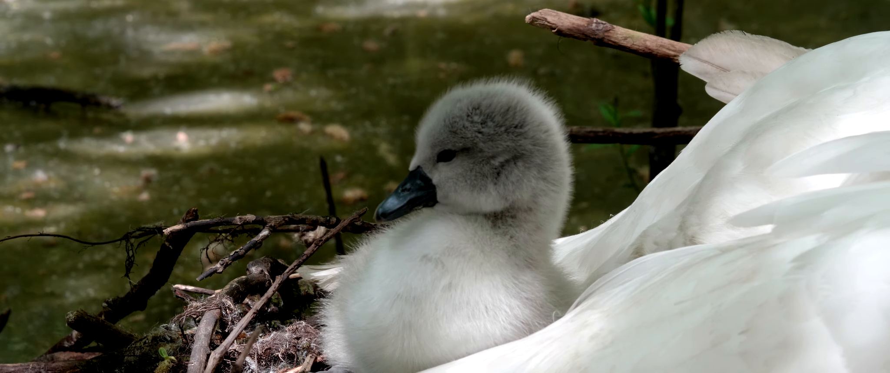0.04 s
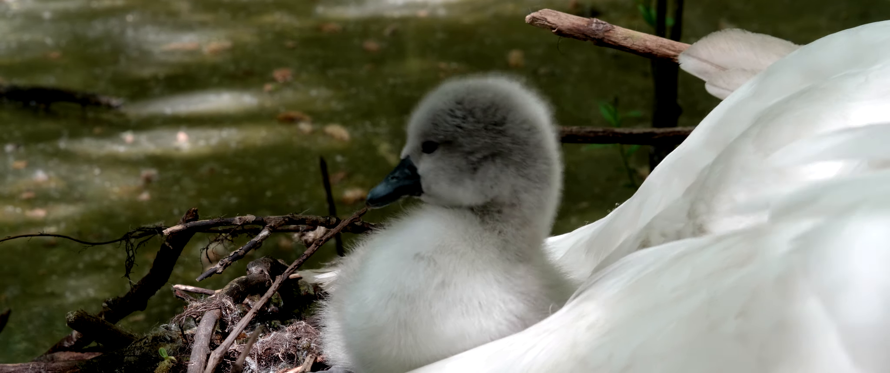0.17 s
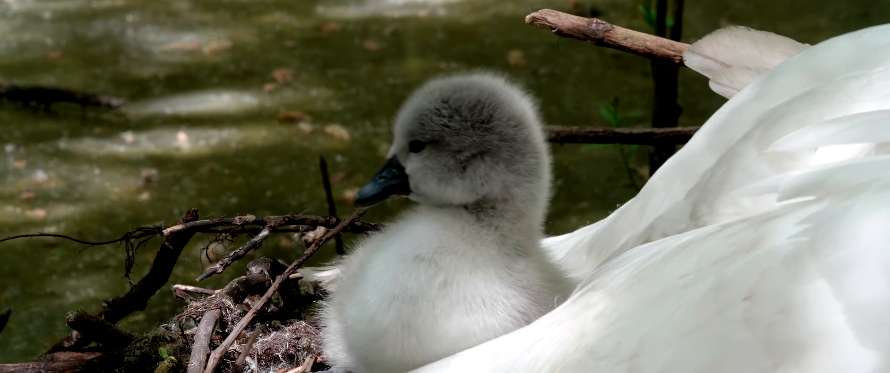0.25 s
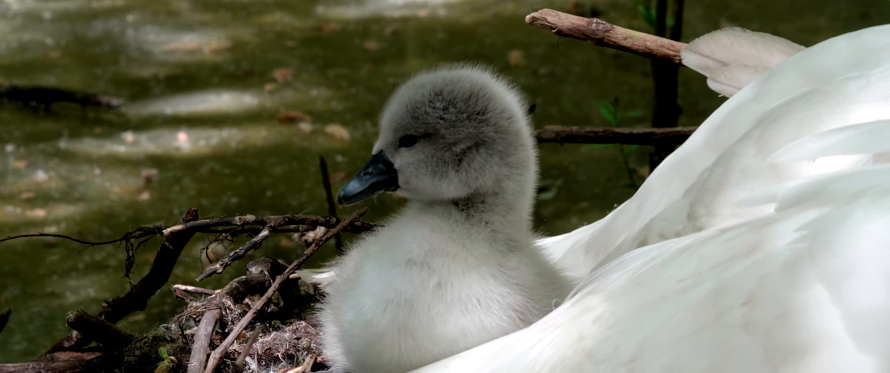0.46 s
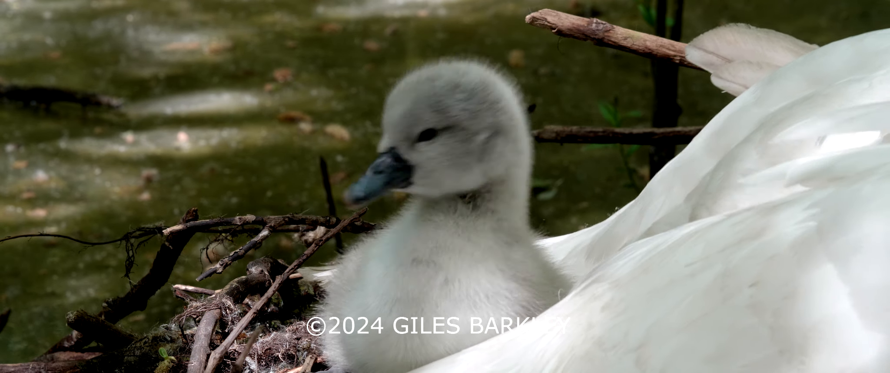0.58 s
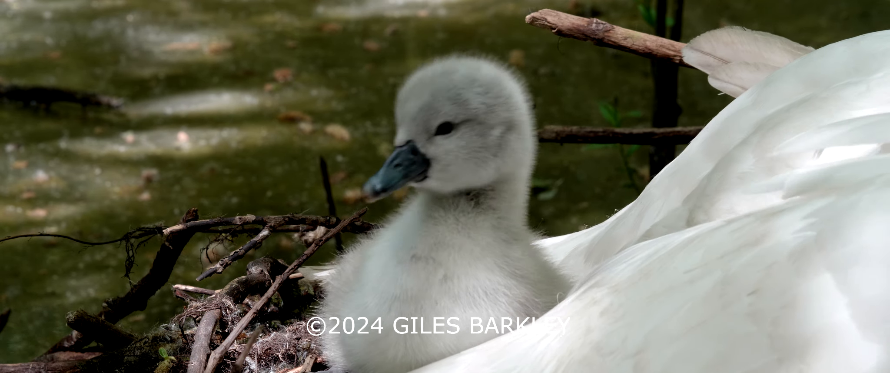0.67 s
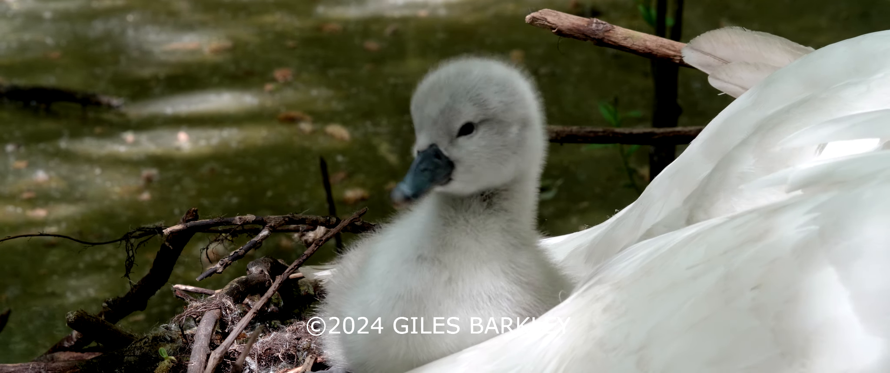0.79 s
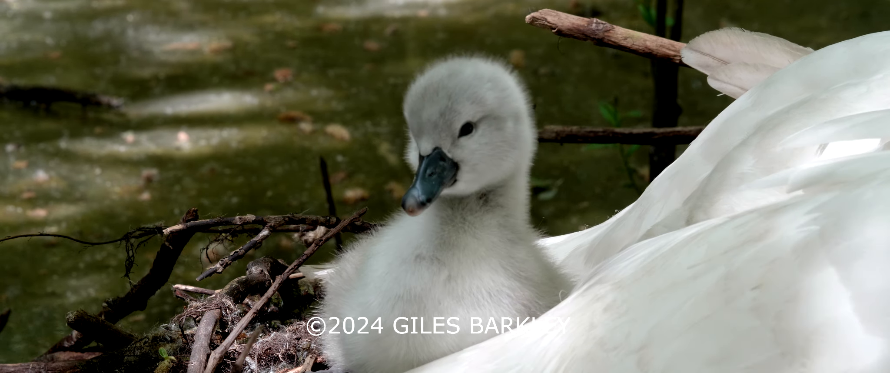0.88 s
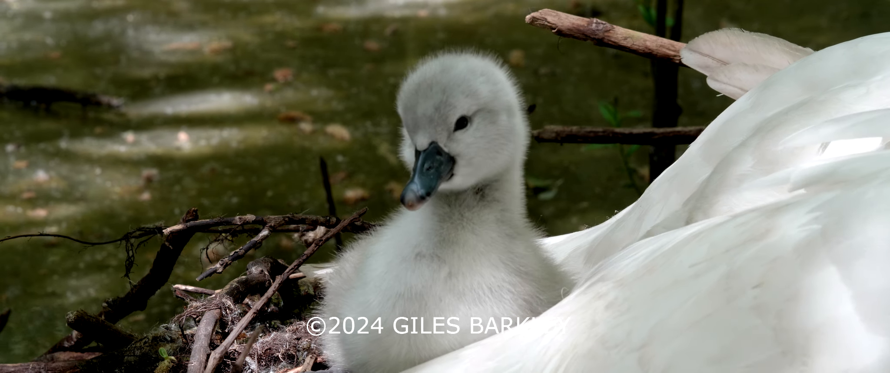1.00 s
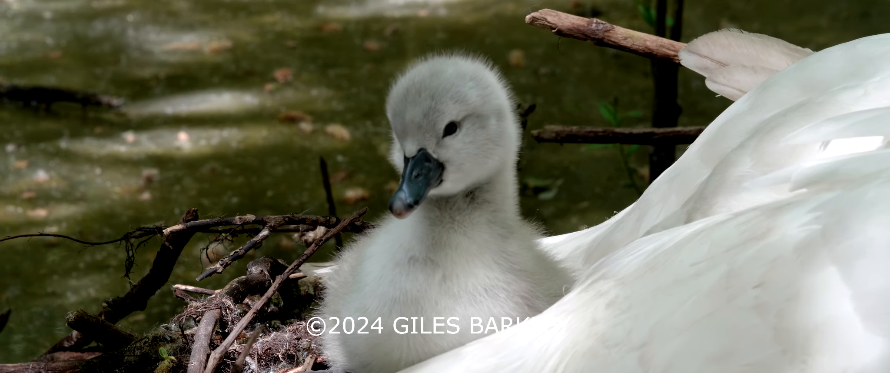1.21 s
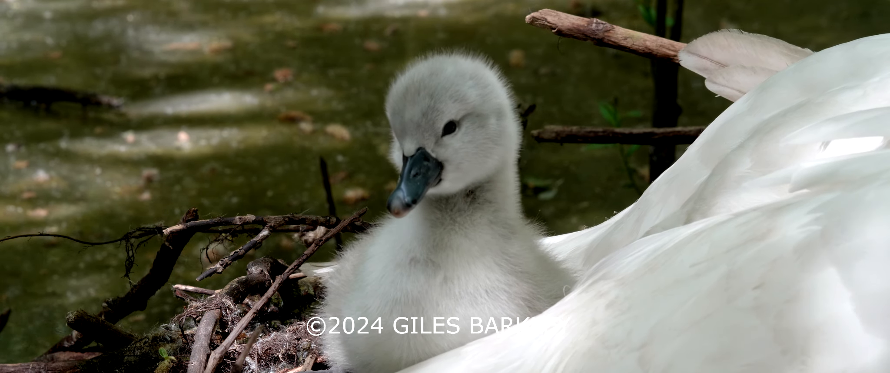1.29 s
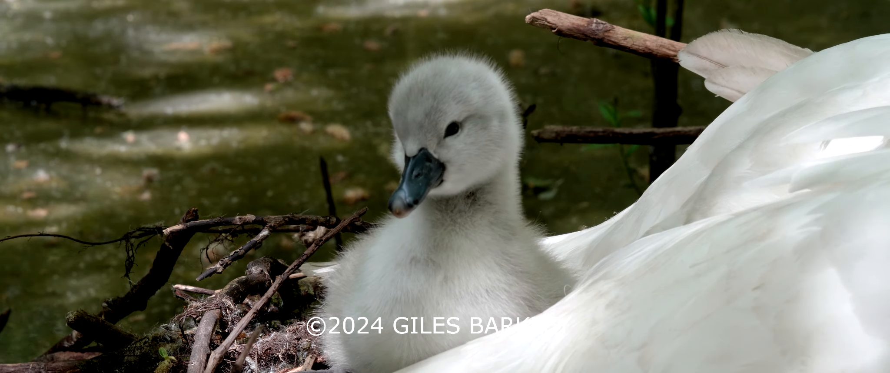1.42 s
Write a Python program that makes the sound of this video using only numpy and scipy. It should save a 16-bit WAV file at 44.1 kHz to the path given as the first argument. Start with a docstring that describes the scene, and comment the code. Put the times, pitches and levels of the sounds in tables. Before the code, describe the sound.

A swan close by gives two short hoarse grunting snorts that break into rattling throat pops

```python
"""A swan close by grunts twice: a nasal hiss opens into a short hoarse note that breaks into slow, separate
throat pops, then comes a second rattle of pops with rushing air but no note. Cygnets peep softly, and small
birds farther off whistle thin high notes over the low rumble of the waterside. Pops are short pushes that ring
throat, bill and chest; the note is a wavering tone with a rasp; air sounds are filtered noise;
peeps are gliding tones and whistles are tones blurred in pitch."""
import sys
import numpy as np
from scipy import signal
from scipy.fft import rfft, irfft
from scipy.io import wavfile

SR = 44100
rng = np.random.default_rng(int(sys.argv[2]) if len(sys.argv) > 2 else 0)


def materialize(psi):
    """Save the field psi as 16-bit PCM at rate SR to the path in sys.argv[1].

    A 1-D psi becomes a single channel; in a 2-D psi each row is a channel.
    """
    bounded = np.clip(np.atleast_2d(psi).T, -1, 1)
    quanta = np.round(bounded * 32767).astype(np.int16)
    wavfile.write(sys.argv[1], SR, quanta)


N = 63945  # length in samples, about 1.45 s


def undb(db):
    """Decibels to gain."""
    return 10 ** (np.asarray(db) / 20)


def unit(x):
    """Scale to rms 1."""
    return x / np.sqrt(np.mean(x ** 2) + 1e-20)


def curve(table, axis=1):
    """One column of a table, joined by straight lines in time."""
    rows = np.array(table, float)
    return np.interp(np.arange(N) / SR, rows[:, 0], rows[:, axis])


def swell(table, axis=1):
    """Gain from a level curve, with a short fade centred on its first and last times."""
    fade_s = .006
    t = np.arange(N) / SR
    inside_s = np.minimum(t - table[0][0], table[-1][0] - t)
    return undb(curve(table, axis=axis)) * np.clip(inside_s / fade_s + .5, 0, 1)


def colour(x, points):
    """Filter through (frequency [Hz], level [dB]) points, falling 40 dB per octave above the last."""
    hz, db = np.array(points, float).T
    f = np.maximum(np.fft.rfftfreq(2 * N, 1 / SR), 1)
    shape = np.interp(np.log(f), np.log(hz), db) - 40 * np.log2(np.maximum(f / hz[-1], 1))
    # folding the cepstrum (the spectrum of the log gain) makes the filter respond only after its input
    cepstrum = irfft(np.log(undb(shape)))
    cepstrum[1:N] *= 2
    cepstrum[N + 1:] = 0
    return irfft(rfft(x, 2 * N) * np.exp(rfft(cepstrum)))[:N]


def ring(x, modes):
    """Add up resonances side by side, each given as (frequency [Hz], width [Hz], level [dB])."""
    out = 0
    for hz, width_hz, db in modes:
        b, a = signal.iirpeak(hz, hz / width_hz, fs=SR)
        out = out + undb(db) * signal.lfilter(b, a, x)
    return out


def soften(x, hz):
    """Fourth-order low-pass."""
    return signal.sosfilt(signal.butter(4, hz, fs=SR, output="sos"), x)


def noise():
    """White noise."""
    return rng.standard_normal(N)


def walk(rate_hz):
    """Smooth random wander, rms 1; a higher rate makes it move faster."""
    f = np.fft.rfftfreq(N, 1 / SR)
    return unit(irfft(rfft(noise()) * np.exp(-(f / rate_hz) ** 2), N))


def turns(hz):
    """Phase in radians of a tone that follows a changing pitch."""
    return 2 * np.pi * np.cumsum(hz) / SR


def waterside():
    """A low steady outdoor rumble under a faint even hiss, both filtered noise."""
    rumble_db, hiss_db = -43, -67
    # colour of the rumble: (frequency [Hz], level [dB per Hz])
    rumble_colour = [(15, -39), (25, 0.5), (75, 0.5), (160, -5.5), (197, -0.5), (232, -8), (267, -6.5),
                     (302, -8.5), (657, -10.5), (1140, -19), (2580, -31), (3300, -36), (4290, -37),
                     (7260, -120)]
    # colour of the faint hiss: (frequency [Hz], level [dB])
    hiss_colour = [(2000, -45), (3300, 9), (6000, 4.5), (10000, 1), (16000, 0.5)]
    rumble = undb(rumble_db) * unit(colour(noise(), rumble_colour))
    hiss = undb(hiss_db) * unit(colour(noise(), hiss_colour))
    return rumble + hiss


def far_birds():
    """Thin whistles, blurred in pitch and drawn out by echoes among the trees."""
    echo_s, echo_db = 0.16, -5.5  # echo_s is the time constant of the echo's energy
    # distant whistles: (time [s], length [s], start pitch [Hz], end pitch [Hz], pitch spread [Hz], level [dB])
    whistles = [(0.03, 0.27, 5020, 5140, 71.6, -60.5), (0.298, .24, 3780, 3835, 338, -56),
                (0.58, 0.24, 5080, 5050, 68.5, -55.5), (0.764, 0.16, 4080, 4243, 223, -52.5),
                (0.863, .17, 4183, 4176, 216, -50), (1.068, 0.19, 5210, 5180, 79, -54.5),
                (1.23, 0.16, 5080, 5140, 80, -62), (1.235, 0.075, 4180, 4170, 154.7, -51),
                (1.29, 0.16, 4324, 4350, 296, -50)]
    t, out = np.arange(N) / SR, np.zeros(N)
    keep = np.exp(-1 / (echo_s * SR))  # share of echo energy kept from one sample to the next
    for at, length, start_hz, end_hz, spread_hz, db in whistles:
        u = np.clip((t - at) / length, 0, 1)  # progress through the whistle
        phase = turns(start_hz + (end_hz - start_hz) * u)
        envelope = np.abs(np.sin(np.pi * u)) ** 0.69
        echo = np.sqrt(signal.lfilter([1 - keep], [1, -keep], envelope ** 2))
        # two random wanders smear the tone over the pitch spread
        blur = walk(spread_hz) * np.cos(phase) + walk(spread_hz) * np.sin(phase)
        clear = 0.81 * envelope * np.sin(phase)
        blurred = (0.42 * envelope + undb(echo_db) * echo) * blur
        out += undb(db) * (clear + blurred)
    return out


def snort():
    """The swan's airflow: hiss at the nostrils, a fluttering rush in the throat and a weak warble between pops."""
    hiss_flutter_db, rush_flutter_db, warble_flutter_db = .8, 2, 3
    warble_jitter = .1  # pitch wander (share of the pitch)
    # hiss through the nostrils: (time [s], level [dB])
    hiss_level = [(.176, -65), (.191, -48), (.225, -41.5), (.256, -32.5), (.267, -40), (.278, -54),
                  (.31, -61), (.37, -58), (.39, -75)]
    # colour of the hiss: (frequency [Hz], level [dB])
    hiss_colour = [(800, 3.5), (1900, 6.5), (2700, 3), (4000, 7), (5200, 2), (7500, 0), (9200, -1.5),
                   (11000, -10), (15000, -28)]
    # air rushing through the throat between pops: (time [s], level [dB])
    rush_level = [(.25, -58), (.275, -35), (.3, -37.5), (.335, -34.5), (.36, -42), (.4, -51), (.5, -52),
                  (.55, -38), (.595, -31.5), (.63, -32), (.655, -42), (.69, -49.5), (.76, -48.5), (.8, -70)]
    # colour of the rush: (frequency [Hz], level [dB])
    rush_colour = [(80, -56), (200, -2.5), (420, -0.5), (650, -6), (830, -11.5), (950, -23), (1100, -20.5),
                   (1600, -28), (3100, -16.5), (4200, -29.5), (9000, -41), (15000, -46)]
    # faint warbling tone in the airflow: (time [s], pitch before jitter [Hz], level [dB])
    warble_path = [(.268, 418, -19), (.28, 526, -38.5), (.29, 637, -32), (.31, 684, -45), (.33, 683, -50),
                   (.36, 600, -74), (.55, 500, -70), (.58, 623.4, -37), (.61, 725.5, -36), (.63, 692, -34),
                   (.65, 664, -60)]

    hiss = unit(colour(noise(), hiss_colour)) * undb(hiss_flutter_db * walk(150))
    rush = unit(colour(noise() * undb(rush_flutter_db * walk(230)), rush_colour))
    phase = turns(curve(warble_path) * (1 + warble_jitter * walk(300)))
    warble = unit(np.sin(phase) * undb(warble_flutter_db * walk(210)))
    return swell(hiss_level) * hiss + swell(rush_level) * rush + swell(warble_path, axis=2) * warble


def throat(x):
    """The long soft throat rings low and passes no treble."""
    # resonances of the long throat: (frequency [Hz], width [Hz], level [dB])
    throat_modes = [(432.6, 54, 6.5), (648, 90, -2.5), (780, 36, -2), (1023, 64, -5.5), (1460, 63, -18),
                    (1713, 13, -8), (1910, 30, -13)]
    return soften(ring(x, throat_modes), 2130)


def bill(x):
    """The hard bill rings brighter."""
    # resonances of the bill and nostrils: (frequency [Hz], width [Hz], level [dB])
    bill_modes = [(1100, 260, -3.5), (1882, 50, 3.5), (2435, 180, 5), (2840, 290, -1), (3250, 45, -6),
                  (4540, 300, -10.5)]
    return soften(ring(x, bill_modes), 5400)


def hoarse_note():
    """A wavering tone; its uneven closures, with a puff of air on each, rasp in throat and bill."""
    jitter, shimmer_db = .014, .9  # wander of pitch (share) and of level
    rasp_db, buzz_db = -9.5, -15.5  # throat and bill, relative to the tone
    slip, breath = 0.31, .25  # wander of closure timing (radians), noise in each closure (share)
    alternate = 0.83  # closures are strong and weak in turn (share)
    lag = 0.67  # dispersion of the throat (radians per partial squared)
    rasp_low_hz = 1390
    # hoarse note: (time [s], pitch before jitter [Hz], level before shimmer [dB])
    note_path = [(.231, 403.2, -41), (.236, 409, -23), (.244, 403.4, -25.5), (.25, 410, -18),
                 (.262, 419, -15.5), (.268, 410, -37), (.275, 400, -45)]
    # clean partials from the lowest up: (level [dB])
    partials_db = [4, -5.5, -16, -10.5]

    phase = turns(curve(note_path) * (1 + jitter * walk(320)))
    effort = swell(note_path, axis=2) * undb(shimmer_db * walk(320))
    tone = np.zeros(N)
    for k, db in enumerate(partials_db):
        tone += undb(db) * np.cos((k + 1) * phase + lag * k ** 2)
    # one narrow pulse per cycle
    closures = np.exp(14 * (np.cos(phase + slip * walk(250)) - 1))
    closures *= 1 + breath * noise()
    closures *= 1 + alternate * np.cos(phase / 2)
    high_pass = signal.butter(3, rasp_low_hz, "high", fs=SR, output="sos")
    drive = signal.sosfilt(high_pass, closures)
    rasp = undb(rasp_db) * unit(throat(drive))
    buzz = undb(buzz_db) * unit(bill(drive))
    return effort * (unit(tone) + rasp + buzz)


def sized(x, db):
    """Give a pop the energy of a sound that holds this level for 10 ms."""
    pop_s = .01
    return x * undb(db) * np.sqrt(pop_s * SR / np.sum(x ** 2))


def pops():
    """Each throat opening is a sharp push and a splutter that ring throat, bill and chest; a wet snap follows."""
    base_body_db, base_crack_db, base_spit_db, base_chest_db = -25, -29, -30, -32.5
    chest_hz, chest_width_hz = 125, 29.6
    splutter_s, splutter = 0.0026, 0.75  # decay time and strength
    snap_s, spit_s, spit_grain = 0.0003, .0028, 0.26  # decay times of snap and longer spit; spit strength
    spit_lag_s = .0004  # crack and spit come this much after the body
    # throat pops, levels relative to the base levels above:
    # (time [s], body level [dB], crack level [dB], treble spit level [dB], top of the spit [Hz])
    pop_list = [(0.2829, -5.5, -17, -21, 11000), (.2912, -3.5, -29, -19, 8000), (0.2962, 5, 1.5, 2, 10500),
                (0.3119, 1.5, -2, -3.5, 10100), (0.316, -1, -24, -32, 8000), (0.3385, -7.5, -40, -24, 8000),
                (0.3406, -8.5, -19.5, -16.5, 10500), (.368, -7, -17.5, -18, 6900),
                (.413, -32, -23.5, -36, 11000), (0.5163, -18.5, -24, -21, 11300),
                (0.5291, -14, -23, -37, 9000), (0.5409, -4.5, -7, -12, 11000),
                (0.5679, -2.5, -15, -22, 7000), (0.571, -11, -12.5, -18, 11010),
                (0.589, -13.5, -7.5, -32, 8910), (0.5939, 1, -2, -4.5, 11700),
                (.618, -3, -12.5, -11.5, 11900), (0.6341, -16, -10.5, -24, 7060), (.64, -1, 0.5, -24, 6900),
                (.667, -7.5, -19, -37, 7000), (0.6707, -25, -16, -22.5, 12000),
                (0.7067, -7.5, -13.5, -27.5, 9100), (0.755, -20, -22, -36, 10000),
                (.806, -26, -32, -43, 8200), (0.863, -29, -26, -47, 8100)]
    # colour of the spit: (frequency [Hz], level [dB])
    spit_colour = [(2000, -42.5), (4000, 6), (5000, 11.5), (5500, 5.5), (6100, 11.5), (6800, 6), (7400, 7),
                   (8200, 4), (9000, 10.5), (10300, -2), (13000, -8.5), (16000, -9)]

    size = SR // 8  # room for one pop in samples
    t, out = np.arange(size) / SR, np.zeros(N)
    push = np.eye(1, size)[0]  # a single-sample click
    chest = ring(push, [(chest_hz, chest_width_hz, 0)])
    chest = ring(chest, [(chest_hz, 200, 0)])
    spit_ring = colour(np.eye(1, N)[0], spit_colour)[:size]
    for at, body_db, crack_db, spit_db, top_hz in pop_list:
        grain = rng.standard_normal((3, size))
        body = throat(push + 0.06 * grain[0] * np.exp(-t / 0.0016))
        crack = bill(push + splutter * grain[1] * np.exp(-t / splutter_s))
        snap = grain[2] * (np.exp(-t / snap_s) + spit_grain * np.exp(-t / spit_s))
        spit = soften(signal.fftconvolve(snap, spit_ring)[:size], top_hz)
        start, late = int(at * SR), int((at + spit_lag_s) * SR)
        out[start:start + size] += sized(body, base_body_db + body_db)
        out[start:start + size] += sized(chest, base_chest_db + body_db)
        out[late:late + size] += sized(crack, base_crack_db + crack_db)
        out[late:late + size] += sized(spit, base_spit_db + spit_db)
    return out


def cygnets():
    """Nearly pure peeps that arch up in pitch and drop quickly."""
    edge = 0.15  # fade at each end (share of the peep)
    # peeps: (time [s], length [s], start pitch [Hz], top pitch [Hz], end pitch [Hz],
    # place of the top [0-1], level [dB], second partial relative to the first [dB])
    peeps = [(0.391, .11, 1726, 2776, 1570, .66, -52.5, -41),
             (1.125, 0.071, 1515, 1780, 1650, 0.9, -52, -13),
             (1.314, .098, 1755, 2414, 2050, .72, -56, -13),
             (1.335, 0.057, 1614, 1745, 1445, 0.59, -43, -15)]
    t, out = np.arange(N) / SR, np.zeros(N)
    for at, length, start_hz, top_hz, end_hz, top, db, second_db in peeps:
        u = np.clip((t - at) / length, 0, 1)  # progress through the peep
        before_top = np.maximum(1 - u / top, 0)
        after_top = np.maximum((u - top) / (1 - top), 0)
        hz = top_hz - (top_hz - start_hz) * before_top ** 1.5 - (top_hz - end_hz) * after_top ** 2.4
        phase = turns(hz * (1 + .005 * walk(230)))
        envelope = np.clip(np.minimum(u, 1 - u) / edge, 0, 1) * undb(db + 1.6 * walk(88))
        tone = np.sin(phase) + undb(second_db) * np.sin(2 * phase)
        out += np.sqrt(2) * envelope * tone  # root 2 brings a sine to rms 1
    return out


def bank_scatter(swan):
    """The bank returns the swan's sound as a short, dying scatter of noise-like echoes."""
    t60_s, scatter_db = .2, -22  # time to die away by 60 dB; level
    t = np.arange(N) / SR
    decay = undb(-60 * t / t60_s) * (t > .003)  # silent for the first 3 ms
    bank = colour(noise() * decay, [(400, -8.5), (3000, -4.5), (12000, -11.5)])
    bank = bank / np.sqrt(np.sum(bank ** 2))
    return undb(scatter_db) * signal.fftconvolve(swan, bank)[:N]


def scene():
    """The swan with a short scatter from the bank, the cygnets, far birds and background."""
    swan = snort() + hoarse_note() + pops()
    mix = waterside() + far_birds() + swan + bank_scatter(swan) + cygnets()
    return mix[None]  # one channel


def record(dry):
    """The recorder cuts the top above 16 kHz with a steep low-pass."""
    return signal.sosfilt(signal.ellip(10, .2, 70, 16000, fs=SR, output="sos"), dry)


dry = scene()
out = record(dry)
materialize(out)
```